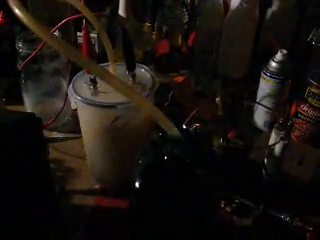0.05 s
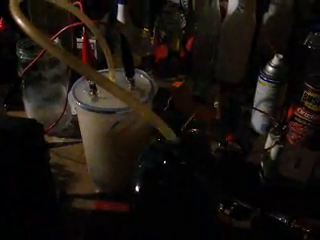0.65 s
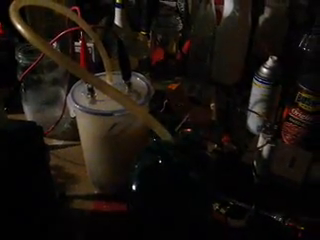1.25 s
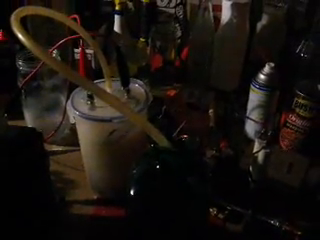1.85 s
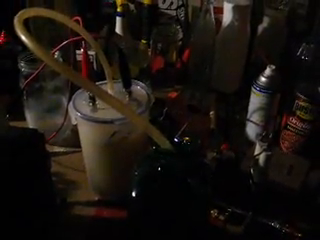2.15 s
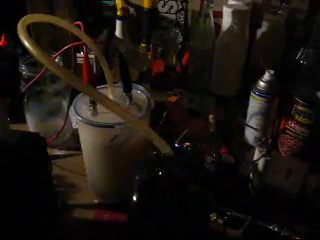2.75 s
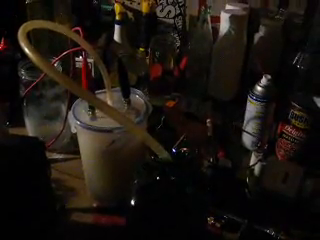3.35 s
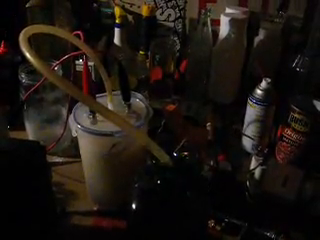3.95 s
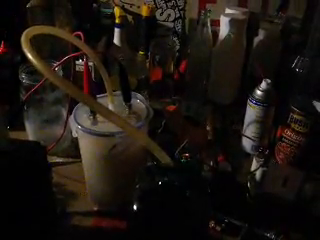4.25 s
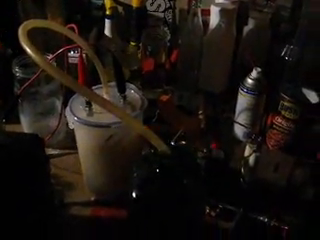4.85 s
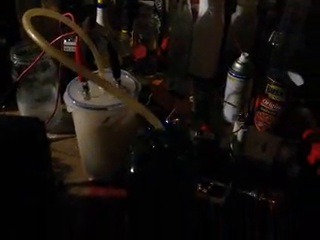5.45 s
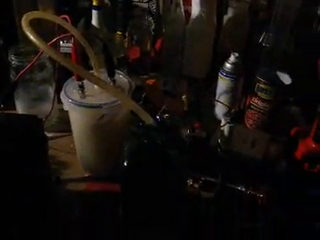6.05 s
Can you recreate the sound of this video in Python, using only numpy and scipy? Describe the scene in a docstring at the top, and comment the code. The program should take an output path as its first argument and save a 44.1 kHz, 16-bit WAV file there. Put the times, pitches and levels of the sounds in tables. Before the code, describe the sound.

Rapid electric spark ticks broken by sharp, irregular pops of igniting gas, over a faint gritty hiss in a small workshop.

```python
"""Sparks igniting gas in a jar

A spark gap ticks about twenty times a second over a jar fed with gas from a small electrolysis cell.
Now and then a spark lights the gas: a sharp pop excites a small, cluttered workshop, and the hardest
pops ring the jar. A camera's 8-bit, 11 kHz sound overloads on the pops and makes the faint hiss gritty."""
import sys
import numpy as np
from scipy import signal
from scipy.fft import rfft, irfft
from scipy.io import wavfile

SR = 44100
rng = np.random.default_rng(int(sys.argv[2]) if len(sys.argv) > 2 else 0)


def wrap_up_sound(samples):
    """Save the sound to the file named by the first command line argument, as 16-bit audio."""
    columns = np.atleast_2d(samples).T
    # keep every value between -1 and 1, then stretch to whole-number steps
    tamed = np.clip(columns, -1, 1)
    steps = np.round(tamed * 32767).astype(np.int16)
    wavfile.write(sys.argv[1], SR, steps)


N = 268569
HZ = np.fft.rfftfreq(4096, 1 / SR)  # frequency grid of the pulse spectra

# Spectral shape of the background noise: frequency_hz, density_db
HISS_SPECTRUM = [(30, -1), (100, -4), (400, -10), (1200, -8.5), (2200, -6), (3200, -2.5), (3900, -2),
                 (4700, -4), (5500, -6)]
# The workshop's diffuse tail: frequency_hz, level_db, t60_s
ROOM_TAIL = [(80, -13.5, 0.08), (275, -10, 0.28), (487, -6.5, 0.087), (755, -9.5, 0.37), (1790, -7, .29),
             (3470, -5.5, .29), (5460, -4, .26)]
# Resonances of the things on the bench: pitch_hz, level_db, t60_s
BENCH_MODES = [(586.4, 2, 0.046), (759, 2, 0.053), (894, -7, .12), (1227, 4.5, 0.075), (1330, 3, 0.098),
               (1890, 2, .11), (2203, 3, .11), (2330, 2.5, .11), (2722, -1.5, 0.18), (3010, -0.5, .12),
               (3183, 1.5, .12), (3328, 1.5, 0.16), (3628, 1, .16), (3930, 2.5, .16)]
# First reflections from the bench and shelves: delay_s, gain
EARLY_REFLECTIONS = [(.0012, 0.17), (.00435, 0.21), (.0058, 0.089), (.0066, 0.065), (.0094, 0.091)]
# Spectral shape of a spark's snap: frequency_hz, level_db
SNAP_SPECTRUM = [(50, -27), (300, -16), (900, -10.5), (1800, -6.5), (2800, -2.5), (3800, 1), (4700, 1.5),
                 (5500, -0.5), (7000, -9.5), (12000, -41.5)]
# Runs of steady firing, between which the gap hesitates: first_s, last_s, spark_count, energy_db
FIRING_RUNS = [ (0.027, 0.338, 7, -11.5), (0.3973, 0.61, 5, -9), (0.7265, 0.7765, 2, -9.5),
               (0.8348, 1.136, 7, -11.5), (1.506, 1.6084, 3, -11.5), (1.6563, 1.797, 4, -12.5),
               (1.8405, 2.014, 5, -11), (2.0605, 2.4224, 9, -13), (2.474, 2.5735, 3, -10.5),
               (2.716, 2.975, 7, -11), (3.021, 3.112, 3, -11), (3.23, 3.36, 4, -13.5),
               (3.411, 3.7756, 9, -12.5), (3.872, 4.054, 5, -13), (4.099, 4.5103, 10, -13),
               (4.563, 4.846, 7, -12), (4.992, 5.272, 7, -12), (5.3189, 5.728, 10, -12.5),
               (5.828, 6.0545, 6, -13), ]
# Single hard cracks out of step with the runs: start_s, energy_db
HARD_CRACKS = [(2.635, -3.5), (3.1598, -3.5), (3.84, 7)]
# Mode clusters of the glass jar: centre_hz, width_hz, level_db, t60_s
JAR_MODES = [(2520, 240, -8, 0.19), (3760, 310, 0.5, .42), (5100, 300, -12.5, 0.3)]
# Spectral shape of a burning gas bubble: frequency_hz, level_db
BLAST_SPECTRUM = [(40, -41), (120, -10), (230, -1.5), (420, -1), (700, 2.5), (1500, 0), (3000, -1),
                  (5500, 2), (7000, -13.5), (12000, -41)]
# One row a pop: start_s, level_db, push_db, push_s, tilt_db_per_octave, edge_hz, lower_resonance_hz,
# lower_resonance_db, upper_resonance_hz, upper_resonance_db, antiresonance_hz, antiresonance_db
GAS_POPS = [ (0.6650, 16.5, -5, 0.00097, 1, 3840, 800, 2.5, 3060, 4.5, 1710, 0),
            (1.1872, 21.5, 5.5, 0.00074, 1.5, 6030, 2620, 4, 3870, 5.5, 4330, -3),
            (1.701, 14, -34, 0.00025, -4.5, 4410, 2340, 9, 3850, 12, 4900, -5),
            (2.6197, -4, -17, 0.00071, 3, 2190, 298, 5, 1100, 10, 1870, -7),
            (2.6636, 15, 1.5, 0.00036, 2, 4620, 1217, 7, 3200, 6, 2210, -3),
            (3.1686, 22.5, -15.5, 0.0014, 2.5, 3965, 1400, 5.5, 2445, 5, 924, -3.5),
            (3.8282, 14.5, -40, 0.00074, 0, 4080, 726, 0.5, 3430, 2.5, 200, -5.5),
            (4.8903, 22, -0.5, 0.00068, 1.5, 4100, 2000, 4.5, 3057, 13, 2704, -12.5),
            (5.179, -6, -26, 0.0013, -3.5, 1490, 250, 4.5, 730, 7, 447, -6),
            (5.326, -2.5, -33, 0.0011, -12, 1150, 245, 4, 745, -2, 450, -1),
            (5.7808, 14, -1, 0.00088, 2.5, 5030, 720, 4.5, 4020, 3.5, 2160, -7.5), ]


def amp(db):
    """Amplitude ratio of a level in decibels."""
    return 10 ** (np.asarray(db) / 20)


def read(points, hz, column=1):
    """Linear interpolation of one table column over log frequency."""
    table = np.array(points)
    return np.interp(np.log(hz + 1), np.log(table[:, 0] + 1), table[:, column])


def add(mix, start_s, sound):
    """Superposition: a sound sums into the mix from its start time on."""
    part = mix[round(start_s * SR):][:len(sound)]
    part += sound[:len(part)]


def pulse(spectrum_db):
    """Minimum phase: the most abrupt causal pulse that has this spectrum."""
    log_gain = np.log(amp(np.concatenate([spectrum_db, spectrum_db[-2:0:-1]])))
    log_response = np.conj(signal.hilbert(log_gain))[:len(spectrum_db)]
    return irfft(np.exp(log_response))


def hiss(rms_db=-52.5):
    """Spectral shaping: filtered white noise gives a steady, bright background."""
    gain = amp(read(HISS_SPECTRUM, np.fft.rfftfreq(N, 1 / SR)))
    noise = irfft(rfft(rng.standard_normal(N)) * gain, N)
    return amp(rms_db) * noise / noise.std()


def workshop(wet_db, ring_db, decay_scale=1, clutter=0.99, clutter_s=.011):
    """Room impulse response: a diffuse tail, damped modes, the direct sound and early reflections."""
    t = np.arange(SR // 2) / SR
    hz, frame_s, bands = signal.stft(rng.standard_normal(len(t)), SR, nperseg=256)
    band_damping = np.log(1000) / (decay_scale * read(ROOM_TAIL, hz, column=2)[:, None])
    envelope = np.sqrt(2 * band_damping / SR) * np.exp(-band_damping * frame_s)
    bands *= amp(read(ROOM_TAIL, hz)[:, None]) * envelope
    tail = signal.istft(bands, SR, nperseg=256)[1][:len(t)]
    out = amp(wet_db) * tail * (1 - np.exp(-t / 0.00042))
    out *= 1 + clutter * np.exp(-t / clutter_s)  # nearby bottles and cans scatter before the walls do
    for pitch_hz, level_db, t60_s in BENCH_MODES:
        damping = np.log(1000) / t60_s
        mode = np.exp(-damping * t) * np.cos(2 * np.pi * pitch_hz * t)
        out += amp(level_db + ring_db) * 2 * damping / SR * mode
    out[0] += 1  # direct sound
    for delay_s, gain in EARLY_REFLECTIONS:
        add(out, delay_s, np.array([gain]))
    return out


def spark_train(jitter_s=.0003, scatter_db=1.0, ignition_lead_s=0.0034, ignition_db=-14):
    """Quasi-periodic firing, plus a spark to light each pop and the hard cracks: start_s, energy_db."""
    steady = np.array([(start_s, energy_db) for first_s, last_s, count, energy_db in FIRING_RUNS
                       for start_s in np.linspace(first_s, last_s, round(count))])
    uneven = steady + rng.standard_normal(steady.shape) * [jitter_s, scatter_db]
    igniting = [(pop_s - ignition_lead_s, ignition_db) for pop_s, *_ in GAS_POPS]
    return [*uneven, *igniting, *HARD_CRACKS]


def sparks(tilt_db_per_octave=1.85, restrike=0.65):
    """Impulsive discharge: each spark is a snap of its own brightness with a weaker second stroke."""
    out = np.zeros(N)
    train = spark_train()
    variations = rng.uniform(-0.61, 1, (len(train), 3))
    for (start_s, energy_db), (tilt, second_stroke, lag) in zip(train, variations):
        snap = pulse(read(SNAP_SPECTRUM, HZ) + tilt_db_per_octave * tilt * np.log2(1 + HZ / 1000))
        add(snap, .00012 * (2 + lag), restrike * second_stroke * snap)
        add(out, start_s, amp(energy_db) * snap / np.linalg.norm(snap))
    return signal.oaconvolve(out, workshop(wet_db=-8.5, ring_db=-5.5))[:N]


def jar_ring(count=14):
    """Beating: close modes of the glass interfere as they decay, giving a rough ring."""
    t = np.arange(SR // 2) / SR
    out = np.zeros(len(t))
    for centre_hz, width_hz, level_db, t60_s in JAR_MODES:
        offset, phase = rng.random((2, count, 1))
        partials_hz = centre_hz + width_hz * ((np.arange(count)[:, None] + offset) / count - .5)
        cluster = np.sin(2 * np.pi * (partials_hz * t + phase)).sum(0) / np.sqrt(count)
        out += amp(level_db) * np.exp(-np.log(1000) * t / t60_s) * cluster
    return out


def pops(edge_drop_db=12, half_width_hz=380, jar_db=-28, full_ring_db=29.5, ring_db_per_db=4):
    """Blast wave: burning gas pushes the air and drives the jar; a faster burn sounds brighter."""
    out = np.zeros(N)
    t = np.arange(SR // 20) / SR
    jar_hz = max(JAR_MODES, key=lambda mode: mode[2])[0]
    for start_s, level_db, push_db, push_s, tilt, edge_hz, *gas_modes in GAS_POPS:
        blast_db = level_db + read(BLAST_SPECTRUM, HZ) + tilt * np.log2(np.maximum(HZ / 700, 1))
        blast_db -= edge_drop_db * (1 + np.tanh((HZ - edge_hz) / 450)) / 2
        # standing waves in the hot gas shift with the mixture that is burning
        for mode_hz, peak_db in zip(gas_modes[::2], gas_modes[1::2]):
            blast_db += peak_db / (1 + ((HZ - mode_hz) / half_width_hz) ** 2)
        room = workshop(wet_db=-1.0, ring_db=-3, decay_scale=0.96)
        add(out, start_s, signal.fftconvolve(pulse(blast_db), room))
        push = (1 - t / push_s) * np.exp(-t / push_s)  # overpressure, then suction
        add(out, start_s, amp(push_db) * push)
        # the ring weakens steeply when the blast falls short at the jar's strongest mode
        shortfall_db = max(full_ring_db - np.interp(jar_hz, HZ, blast_db), 0)
        add(out, start_s, amp(jar_db - ring_db_per_db * shortfall_db) * jar_ring())
    return out


def scene():
    """Superposition: sparks, pops and hiss sum into one channel."""
    return (sparks() + pops() + hiss())[None]


def record(dry, ceiling=.34, low_cut_hz=35, smoothing_hz=5800, step=1 / 128, hold=4, edge_hz=12800):
    """Saturation and quantisation: the microphone stage overloads, then 8 bits at a quarter rate."""
    clipped = dry / (1 + (dry / ceiling) ** 4) ** (1 / 4)
    coupled = signal.lfilter(*signal.butter(1, low_cut_hz, "high", fs=SR), clipped)
    smoothed = signal.oaconvolve(coupled, signal.firwin(41, smoothing_hz, fs=SR)[None], "same")
    quantised = step * np.floor(smoothed[:, ::hold] / step)  # faint noise flips the lowest bit: grit
    held = np.repeat(quantised, hold, axis=1)[:, :N]  # stair steps mirror the spectrum into the treble
    band_limit = signal.firwin(255, edge_hz, window=("kaiser", 8), fs=SR)
    return signal.oaconvolve(held, band_limit[None], "same")


dry = scene()
out = record(dry)
wrap_up_sound(out)
```